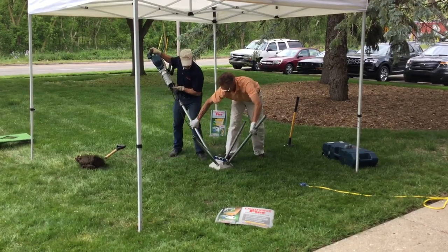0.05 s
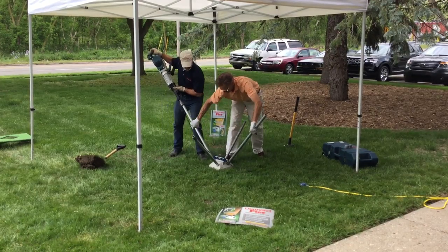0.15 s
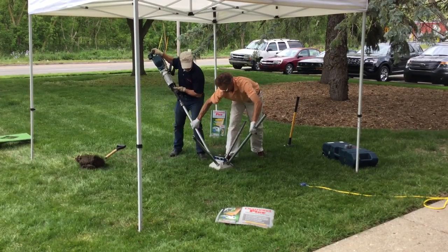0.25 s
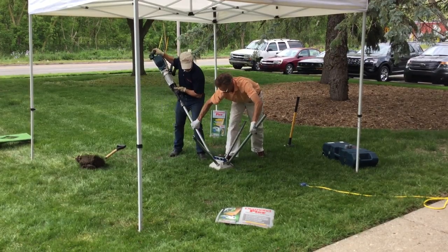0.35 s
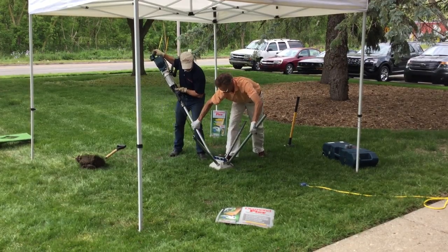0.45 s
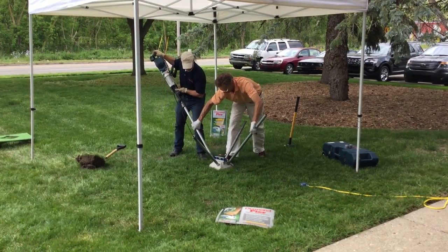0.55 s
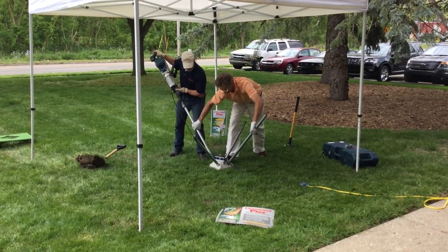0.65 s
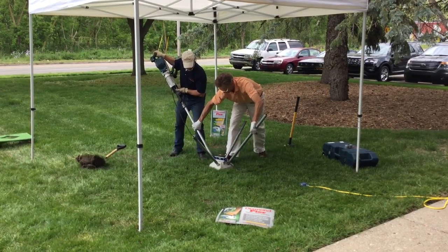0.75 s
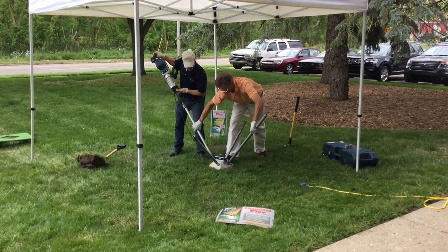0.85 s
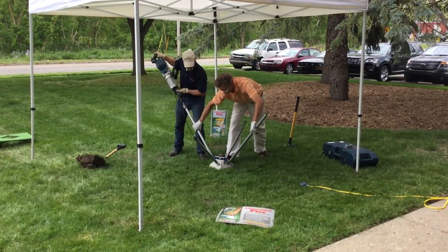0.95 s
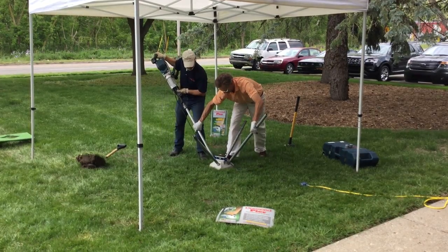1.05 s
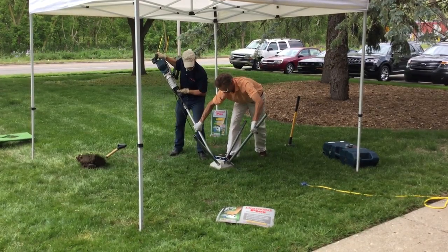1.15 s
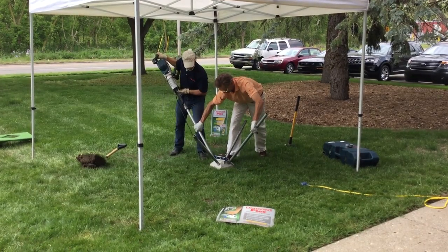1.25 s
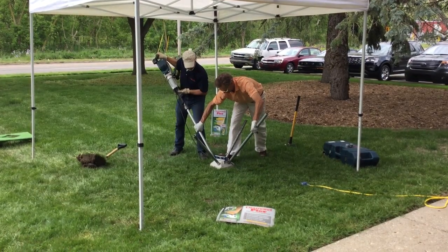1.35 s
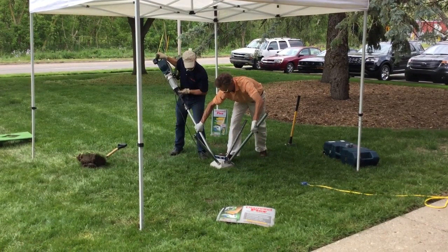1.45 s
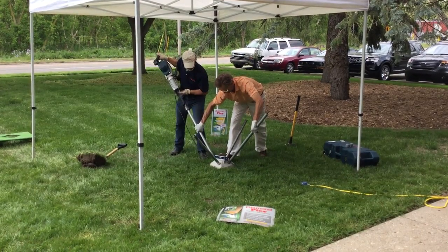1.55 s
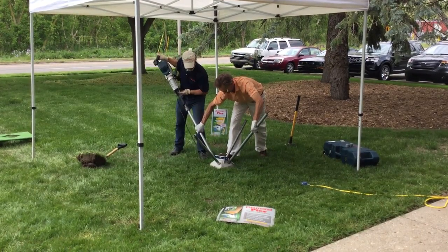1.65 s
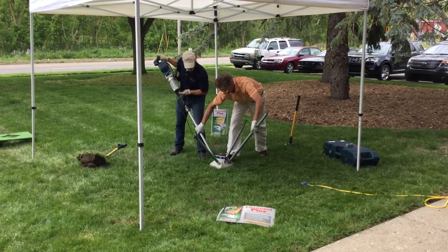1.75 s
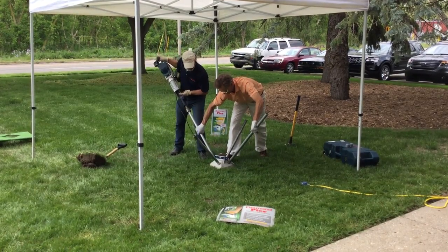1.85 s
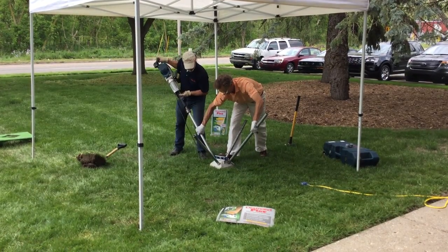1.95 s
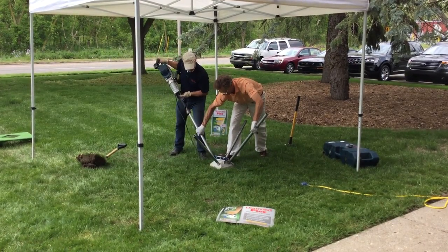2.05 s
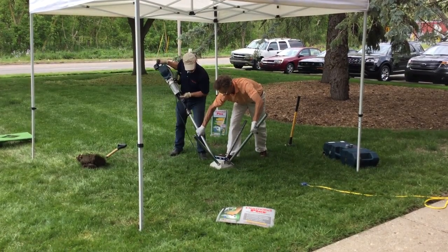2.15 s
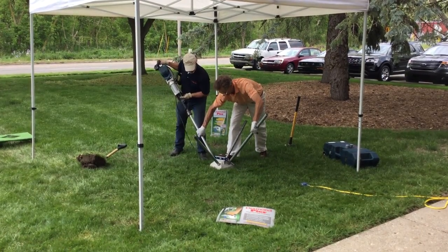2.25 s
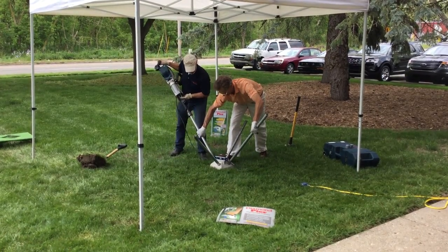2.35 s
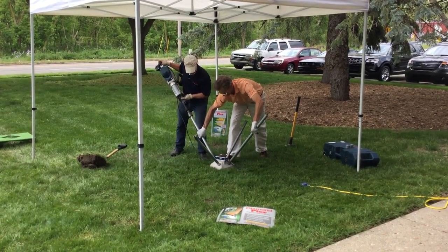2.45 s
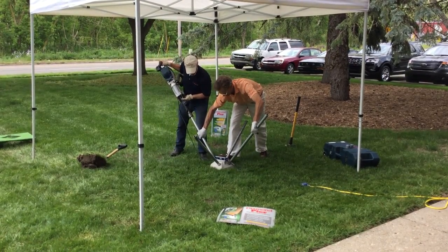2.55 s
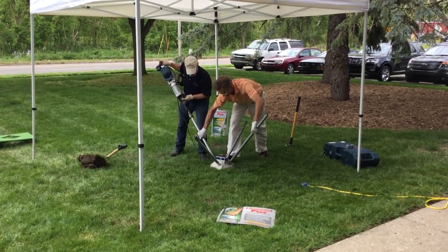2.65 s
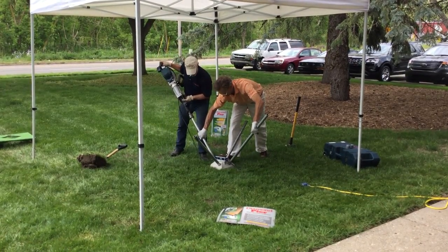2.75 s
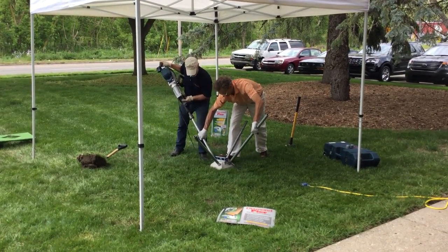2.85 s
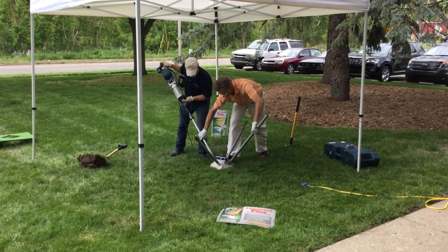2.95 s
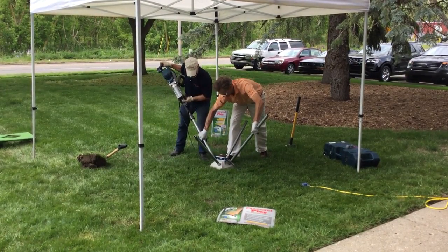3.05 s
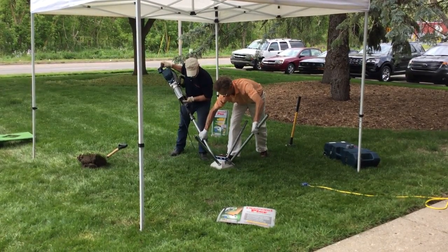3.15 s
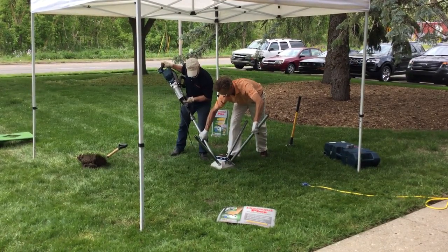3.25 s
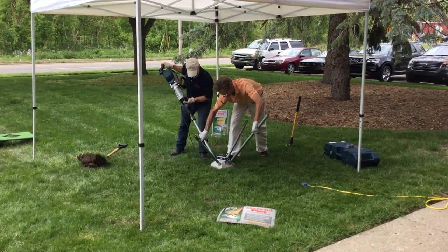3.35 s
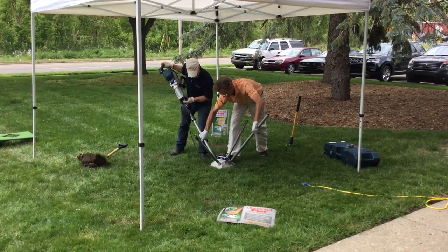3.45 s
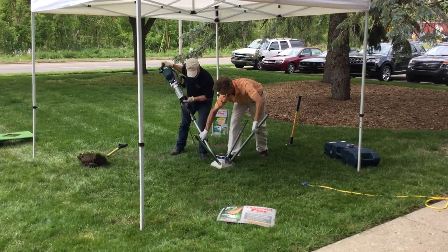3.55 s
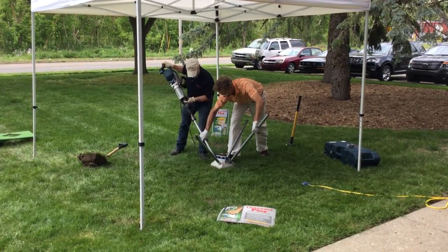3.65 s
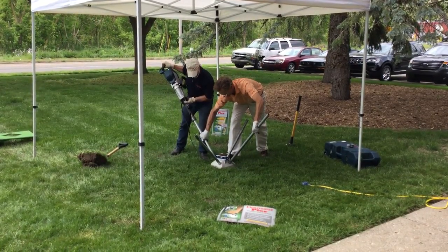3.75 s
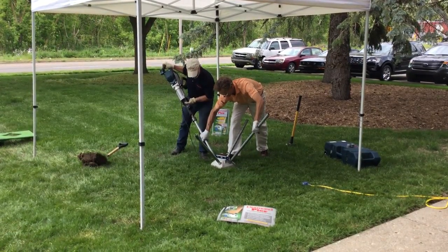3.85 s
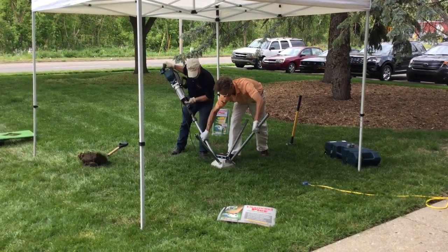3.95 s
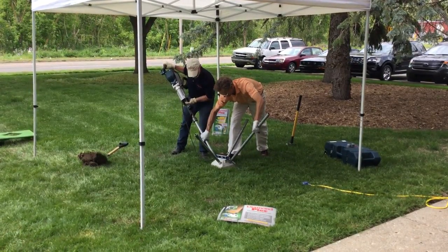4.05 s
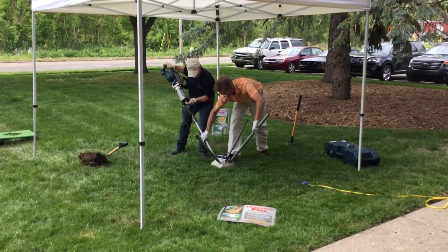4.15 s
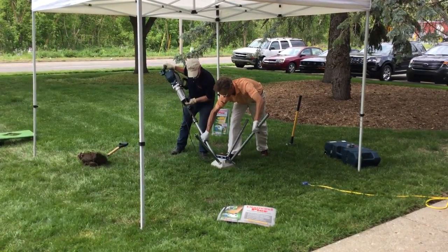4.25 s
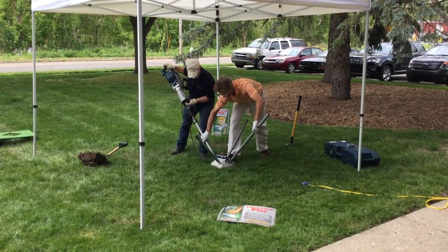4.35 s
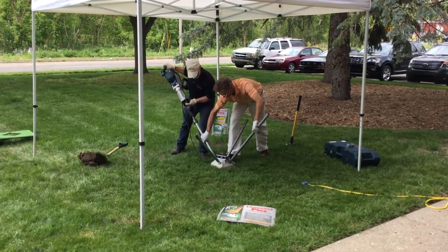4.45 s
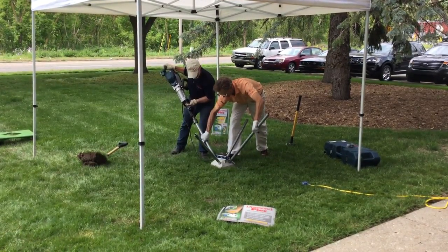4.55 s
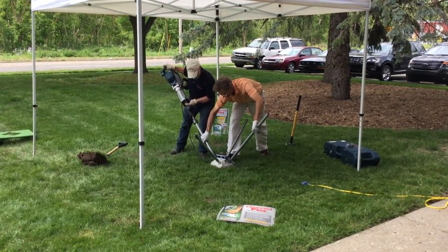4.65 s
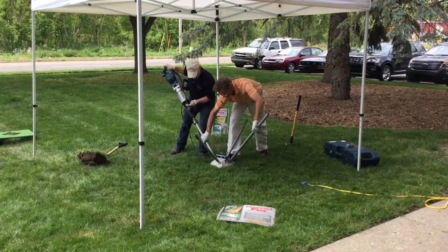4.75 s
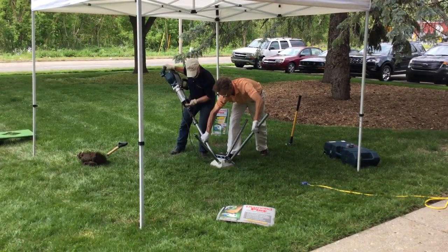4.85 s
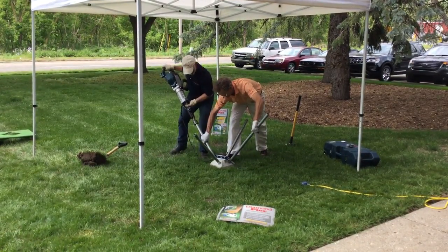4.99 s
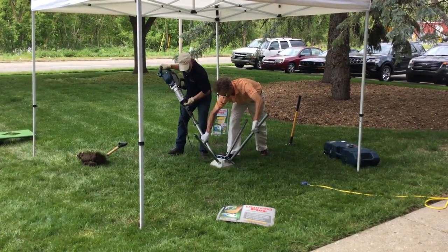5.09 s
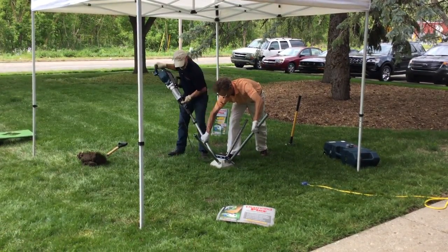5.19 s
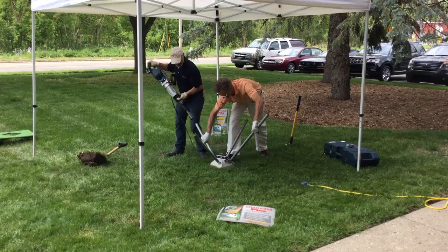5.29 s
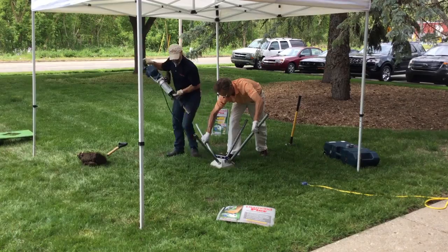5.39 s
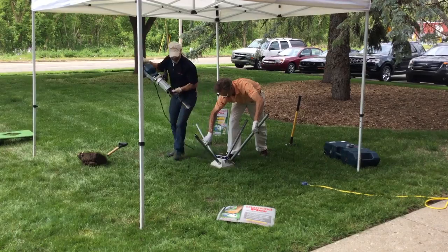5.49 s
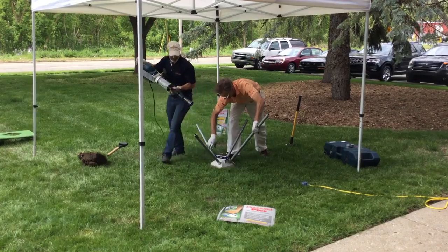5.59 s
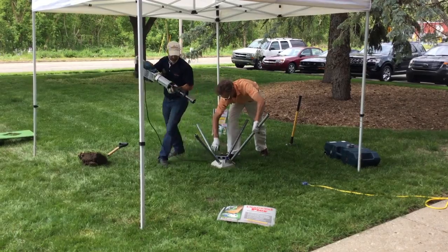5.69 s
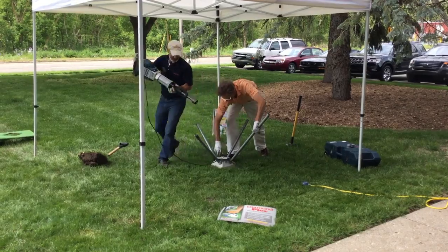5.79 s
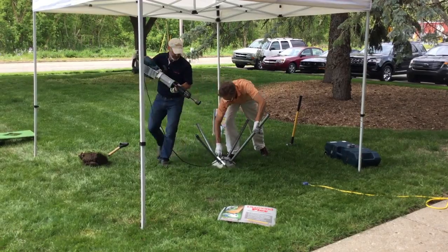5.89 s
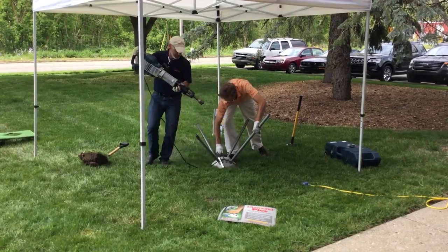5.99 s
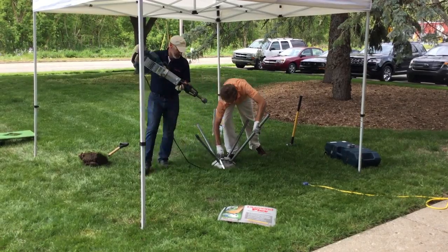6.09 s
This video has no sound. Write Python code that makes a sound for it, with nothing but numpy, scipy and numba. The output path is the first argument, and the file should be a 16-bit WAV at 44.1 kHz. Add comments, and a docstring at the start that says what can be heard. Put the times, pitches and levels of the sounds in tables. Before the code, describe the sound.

Outdoors, heard from a few metres away, an electric demolition hammer pounds a steel pin in a loud, rapid stream of clattering, ringing strikes with dull thumps beneath. Its motor roars and hisses behind the blows. Near the end the hammer lifts off and the strikes cease, leaving the softer whirr of the motor and a thin rising whine above a faint low rumble.

```python
"""An electric demolition hammer drives a steel pin into a lawn, a few metres away, about 22 blows a second.
Each blow cracks as metal meets metal, sets pin and bit ringing and lands with a low thud.
Under the blows the motor's gears roar and its fan hisses; lifted off near the end, the motor
runs free and its whine climbs. A low rumble lies beneath it all."""
import sys
import numpy as np
from scipy import signal
from scipy.fft import rfft, irfft
from scipy.io import wavfile
from scipy.ndimage import uniform_filter1d
from numba import njit

SR = 44100
rng = np.random.default_rng(int(sys.argv[2]) if len(sys.argv) > 2 else 0)


def log_audio(samples):
    """Write samples as a 16-bit WAV file to the path given in sys.argv[1]."""
    # one column per channel
    frames = np.atleast_2d(samples).T
    # limit to full scale, then quantise
    limited = np.clip(frames, -1, 1)
    pcm = np.round(limited * 32767).astype(np.int16)
    wavfile.write(sys.argv[1], SR, pcm)


N = 270185

# The hammer's blows: t/s, crack level/dB, thump level/dB, knock level/dB
HAMMER_BLOWS = [(0.0017, -19, -30, -38), (0.0433, -18.5, -24, -35), (0.0813, -15.5, -26, -31),
                (0.118, -14, -21, -34), (0.1541, -12, -15, -24), (0.1912, -12, -10.5, -4),
                (0.2351, -20.5, -29, -34), (0.2722, -21.5, -23, -21), (0.31, -16, -21, -32),
                (0.3514, -14.5, -19, -21), (0.3873, -9.5, -21, -29), (0.426, -12.5, -19, -30),
                (0.4669, -7.5, -10, 0.5), (0.5065, -10.5, -11, 3.5), (0.5497, -8, -16, 1),
                (0.5922, -9.5, -3, 0), (0.6362, -11, -17, -3), (0.6815, -11.5, -17, 2),
                (0.7268, -10.5, -2.5, 0), (0.773, -11, -8.5, -4), (0.818, -12.5, -18, -5),
                (0.8638, -12, -23, -4), (0.9096, -10.5, -5.5, 6), (0.955, -12, 2.5, 1),
                (1.0004, -10.5, -1.5, -3), (1.0467, -13, -12, -2.5), (1.092, -12.5, -6.5, -0.5),
                (1.138, -12.5, -7, -7), (1.1831, -13.5, -10, -4), (1.2294, -12, -5.5, 4),
                (1.276, -14.5, -11.5, -8), (1.3215, -11, -11, -3), (1.3654, -12, -10, -4),
                (1.411, -10.5, -6, 0), (1.4576, -12, -13, -3.5), (1.5034, -12.5, -17, -7),
                (1.5497, -10, -18, 0), (1.5956, -10, -19, 0), (1.6419, -12.5, -16, -11),
                (1.6887, -12, -31, -7), (1.734, -12, -13, -4), (1.7791, -11.5, -14, -1.5),
                (1.8261, -11.5, -32, 3), (1.871, -10.5, -23, 4), (1.9183, -11, -33, -30),
                (1.9661, -10.5, -10.5, -7), (2.0107, -13.5, -18, -4), (2.0566, -9, -22, -5),
                (2.1018, -10.5, -14.5, -8.5), (2.1492, -13, -7.5, -29), (2.1953, -12.5, -32, -21),
                (2.2404, -12.5, -8, -2), (2.2868, -12.5, -33, -12), (2.3329, -13.5, -16, -8),
                (2.3797, -11, -13, -19), (2.426, -12, -3.5, -6), (2.4716, -11, -11.5, -9),
                (2.5169, -10, -14, -11), (2.5627, -11, -14.5, -23), (2.6088, -12, -19.5, -7),
                (2.655, -9.5, -7, -5), (2.7005, -11, -19, -12), (2.7466, -13, -16, -13),
                (2.7935, -12.5, -25, -19), (2.8394, -13.5, -15, -8), (2.886, -11.5, -27, -5),
                (2.9316, -12.5, -20, -22), (2.978, -15, -21, -11.5), (3.0226, -14, -19, -9.5),
                (3.0695, -10, -10, -3), (3.1152, -10.5, -9, -6), (3.163, -13.5, -10, -17),
                (3.2085, -13, -25, -0.5), (3.2564, -8.5, -6.5, -1.5), (3.3032, -15.5, -11.5, -26),
                (3.3487, -15.5, -14, -5.5), (3.3952, -13, -19, -12), (3.4408, -11.5, -31, -30),
                (3.487, -13.5, -12.5, -23), (3.5326, -13, -31, -12), (3.5804, -13.5, -7, -21),
                (3.6264, -9, -18, -8.5), (3.6769, -13, -34, -26), (3.7177, -11.5, -36, -11),
                (3.767, -19, -35, -23), (3.812, -12.5, -42, -14), (3.8588, -13.5, -35, -13),
                (3.9021, -12.5, -20, -19), (3.9455, -8, -25, -4.5), (3.9898, -13, -26, -12),
                (4.0356, -10.5, -30, -6), (4.0829, -13, -26, -10), (4.1294, -14, -9, 0),
                (4.175, -12, -5, -7), (4.2211, -14.5, -16, -6.5), (4.2682, -13.5, -19, -30),
                (4.3153, -14, -21, -16), (4.3601, -12, -29, -20), (4.406, -13.5, -27, -22),
                (4.4546, -13.5, -40, -16), (4.4996, -12, -38, -17), (4.5467, -11, -13.5, -16),
                (4.591, -14, -19.5, -9.5), (4.641, -15, -35, -18), (4.6829, -16, -16.5, -18),
                (4.7317, -12.5, -33, -14), (4.7754, -14, -13, -25), (4.8243, -14, -22, -13),
                (4.869, -13, -15, -13), (4.917, -11.5, -37, -36), (4.9606, -15, -31, -20),
                (5.01, -17, -36, -15), (5.053, -13.5, -42, -32), (5.1029, -14, -26, -23),
                (5.149, -12, -28, -26), (5.194, -15.5, -19, -28), (5.2401, -12.5, -29, -19),
                (5.332, -28.5, -48, -40)]
def hammer(t):
    """Each blow cuts off the one before and fires three layers: ring, crack and thud."""
    blows = np.array(HAMMER_BLOWS, float)
    blow = np.maximum(np.searchsorted(blows[:, 0], t, side="right") - 1, 0)  # index of the latest blow
    age = t - blows[blow, 0]
    return steel_ring(blow, age, blows) + crack(blow, age, blows) + thud(blow, age, blows)


# Bright colour of the shock: f/Hz, level/dB
SHOCK_EQ = [(300, -6), (1000, -5.5), (3000, 4.5), (4500, -1.5), (6500, 8), (8200, -36), (9300, 12),
            (10500, -10), (14200, -10), (15000, -40), (16000, -40)]
# Colour of the clattering parts: f/Hz, level/dB
CLATTER_EQ = [(300, -6.5), (850, -7.5), (1200, 1), (3200, 1), (4600, -6), (7000, -1), (8200, -9.5),
              (10300, -7), (14300, -5.5), (14900, -80), (15500, -38)]
# Resonances in the clatter: f/Hz, width/Hz, level/dB
CLATTER_PEAKS = [(2750, 200, -3), (3100, 250, 2), (4200, 150, -4), (5890, 200, 4), (6700, 350, 4),
                 (7590, 300, 1), (9070, 400, 4), (11000, 500, -4), (14250, 300, 0)]
# Choked modes of bit and housing: f/Hz, level/dB re crack, t60/s
HOUSING_MODES = [(6700, 2.5, 0.025), (7550, -6.5, 0.028), (3020, -28.5, 0.01), (1726, -9.5, 0.03),
                 (5840, -6.5, 0.06), (1154, -16.5, 0.037)]
def crack(blow, age, blows):
    """Metal meets metal: the shock runs up and down the pin, the bit bounces, loose parts clatter."""
    chance = rng.standard_normal((len(blows), 12))[blow].T
    shock = sum(undb(-4.5 * k + 2.2 * chance[k]) * fade(age - .0013 * k, t60=.0045) for k in range(4))
    bounce = sum(undb(-5.5 + 1.9 * chance[7 + k]) * fade(age - delay * np.exp(.3 * chance[9 + k]), .01)
                 for k, delay in enumerate((.005, .011)))
    return_age, piston_hz = age - .029 - .0038 * chance[5], 2187  # the piston returns: a ping and a tick
    ping = undb(-26.5 + 5.3 * chance[4]) * fade(return_age, .32)
    ping *= np.sin(2 * np.pi * piston_hz * return_age)
    tick = undb(-15 + 3 * chance[4]) * fade(return_age, .008)
    loose = undb(-9 + 1.5 * chance[6]) * (fade(age, .045) + .42 * fade(age, .3)) * undb(3 * walk(300))
    out = undb(2.5) * shock * noise(SHOCK_EQ) + ping
    out += (loose + tick + bounce) * noise(CLATTER_EQ, CLATTER_PEAKS)
    for hz, db, t60 in HOUSING_MODES:
        strength, detune, start = rng.standard_normal((len(blows), 3))[blow].T
        cycles = hz * (1 + .0062 * detune) * age + start
        out += undb(db + 3 * strength) * fade(age, t60) * np.sin(2 * np.pi * cycles)
    return undb(blows[blow, 1]) * out


# Modes of pin and bit: f/Hz
RING_HZ = [5911, 6595, 3085, 14165, 9634, 13820, 8870, 9060, 13290, 15170, 1615]
# Random part of each mode's strike, and its decay: level/dB re crack, t60/s
RING_MODES = [(-13, .28), (-16, .25), (-15, .14), (-18, 0.33), (-11.5, 0.3), (-20, 0.48), (-21, 0.15),
              (-19, 0.14), (-28, .15), (-45, .15), (-23.5, .1)]
# Steady part of the strike: t/s, then level/dB re crack for each of the first four modes
RING_STEADY = [(0, -23, -5, -3, -9), (.2, -9, -4, -7, -7), (.45, -20, -7, -7, -18),
               (.85, -11, -21, -6.5, -15), (1.1, -5, -1, -1.5, -20), (1.35, -18, 0.5, -18, -16),
               (1.65, -7, -4.5, -8, -10), (1.9, -19, -13, -9, -10), (2.4, -15, -8, -22, -23),
               (2.85, -1.5, -16.5, -12, -11), (3.3, -5, -12, -12, -11), (3.55, -7, -27, -21, -16),
               (4.1, -3.5, -8.5, -13, -15), (4.6, -12.5, -9, -13, -12), (5.25, -2.5, -9, -3.5, -9)]
def steel_ring(blow, age, blows):
    """Every blow restarts each mode, beating with a close twin; hands and soil roughen the ring."""
    out, steady_db = 0, along(RING_STEADY, blows[:, 0])
    for k, (hz, (db, t60)) in enumerate(zip(RING_HZ, RING_MODES)):
        real, imag, detune, split = rng.standard_normal((len(blows), 4)).T
        start, twin_start = 2 * np.pi * rng.random((len(blows), 2)).T
        steady = undb(steady_db[k]) if k < len(steady_db) else 0
        strength = np.abs(undb(db) * (real + 1j * imag) / np.sqrt(2) + steady) * undb(blows[:, 1])
        phase = 2 * np.pi * (hz + 7 * detune[blow]) * age + .5 * walk(150)
        twin = .3 * np.sin(phase + 2 * np.pi * 30 * split[blow] * age + twin_start[blow])
        envelope = strength[blow] * undb(2 * walk(130)) * fade(age, t60)
        out += envelope * (np.sin(phase + start[blow]) + twin)
    swell = 1 - .5 * np.exp(-np.maximum(age, 0) / .012)  # the ring dips at the crack, then swells back
    return swell * out


# Level ride of the base plate: t/s, level/dB re crack
PLATE_RIDE = [(0, -15), (.4, -15.5), (.9, -12), (1.5, -11.5), (1.85, -22.5), (2.4, -15), (3.4, -15),
              (3.75, -23), (3.95, -12.5), (5.25, -11.5)]
# Colour of the plate's buzz: f/Hz, level/dB
PLATE_EQ = [(90, -11), (150, -6.5), (230, -0.5), (300, -8.5), (420, -25), (600, -46)]
def thud(blow, age, blows):
    """A low thump that falls quickly in pitch as it dies, a knock, and the base plate's hum and buzz."""
    chance = rng.standard_normal((len(blows), 7))[blow].T
    age = np.maximum(age - .0006, 0)  # lands just behind the crack
    cycles = pitch_drop(age, from_hz=434, to_hz=71, glide_s=.003 * np.exp(.35 * chance[0]))
    tone = fade(age, .05 * np.exp(.25 * chance[5])) * np.sin(2 * np.pi * (cycles + .36 + .12 * chance[1]))
    low_noise = .2 * fade(age, .06) * noise([(40, -12), (80, 0), (160, -2), (400, -12), (700, -40)])
    thump = (1 - np.exp(-age / .0011)) * (tone + low_noise)
    cycles = pitch_drop(age, from_hz=1098, to_hz=270, glide_s=.0014 * np.exp(.43 * chance[2]))
    knock = (1 - np.exp(-age / .00075)) * fade(age, .011) * np.sin(2 * np.pi * (cycles + .23 * chance[3]))
    plate_hz = 225.7 * (1 + .04 * chance[4])
    hum = fade(age, .062) * np.sin(2 * np.pi * plate_hz * age)
    buzz = .49 * fade(age, .17) * noise(PLATE_EQ)
    onset, crack_db, thump_db, knock_db = blows[blow].T
    plate_db = crack_db + along(PLATE_RIDE, onset)[0] + 2.94 * chance[6]
    return undb(thump_db) * thump - undb(plate_db) * (hum + buzz) + undb(knock_db) * knock


# Overtones of the whine: multiple of the slot rate, relative level/dB
WHINE_OVERTONES = [(2, 0), (3, -7)]
def armature_whine(t):
    """Running free, the armature whines at its slot rate, climbing towards full speed."""
    freed_s, spin_up_s, loaded_hz, full_hz = 5.36, .34, 3500, 4330
    lag = np.exp(-np.maximum(t - freed_s, 0) / spin_up_s)
    hz = full_hz - (full_hz - loaded_hz) * lag
    phase = 2 * np.pi * np.cumsum(hz * (1 + .0013 * walk(60))) / SR
    overtones = sum(undb(db + 3 * walk(33)) * np.sin(k * phase) for k, db in WHINE_OVERTONES)
    brightness = undb(-2) * np.clip((t - 5.55) / .15, .15, 1)
    tone = undb(2.2 * walk(25)) * np.sin(phase) + brightness * overtones
    fade_in = np.clip((t - freed_s) / .08, 0, 1) ** 2
    return undb(-46 + 9 * lag) * fade_in * tone  # the surge eases as the armature spins up


# Colour of the motor's roar: f/Hz, level/dB
ROAR_EQ = [(180, -58), (300, 3.5), (337, -8.5), (516, -4), (618, 2.5), (765, -8.5), (979, 0.5),
           (1290, -7.5), (1580, 1.5), (3700, 0), (4150, -2), (5060, -3.5), (8140, -4.5), (15200, -12)]
# Resonances of the motor housing: f/Hz, width/Hz, level/dB
ROAR_PEAKS = [(1086, 42, 2), (1244, 123, 16.5), (1606, 114, 6), (2157, 310, 5.5), (3180, 86, -6),
              (606, 170, -4)]
# Level ride of the motor: t/s, roar level/dB, fan shelf level/dB re roar
MOTOR_RIDE = [(0, -30.5, 2.5), (5.22, -32, 7.5), (5.29, -35, -4), (5.4, -37, -2), (5.5, -32, -4),
              (5.75, -30, -1), (6.13, -29, -2)]
def motor_roar(t):
    """Gears roar in the housing; the fan's hiss is a treble shelf on the same noise."""
    roar_db, fan_db = along(MOTOR_RIDE, t)
    roar = undb(walk(25) + .8 * walk(250)) * noise(ROAR_EQ, ROAR_PEAKS)
    fan = signal.sosfiltfilt(signal.butter(1, 4500, "high", fs=SR, output="sos"), roar)
    return undb(roar_db) * (roar + (undb(fan_db) - 1) * fan)


# Colour of the low bed: f/Hz, level/dB
RUMBLE_EQ = [(15, -38), (25, -6), (81, -3), (150, -9.5), (292, -20.5), (348, -17), (370, -56), (500, -20),
             (650, -57), (1100, -120)]
# Level ride of the low bed: t/s, level/dB
RUMBLE_RIDE = [(0, -44.5), (5.3, -41.5), (5.45, -41.5), (6.13, -39.5)]
def rumble(t):
    """A bed of low noise that wavers gently."""
    return undb(along(RUMBLE_RIDE, t)[0] + 2 * walk(6)) * noise(RUMBLE_EQ)


def undb(db):
    return 10 ** (np.asarray(db) / 20)


def noise(eq, peaks=()):
    """Noise of rms 1, coloured by an EQ curve and lifted at resonant peaks."""
    hz = np.maximum(np.arange(N // 2 + 1) * SR / N, 1)
    eq_hz, eq_db = np.transpose(eq)
    gain = undb(np.interp(np.log(hz), np.log(eq_hz), eq_db, left=-90))
    lift = 1 + .74 * sum(undb(db) / (1 + (2 * (hz - centre) / width) ** 2) for centre, width, db in peaks)
    x = irfft(rfft(rng.standard_normal(N)) * gain * lift, N)
    return x / np.std(x)


def walk(rate):
    """Smooth random wobble, rate steps a second, with a spread near 1."""
    hold = int(SR / rate)
    steps = np.repeat(rng.standard_normal(N // hold + 1), hold)
    return 1.22 * uniform_filter1d(uniform_filter1d(steps, hold), hold)[:N]


def fade(age, t60):
    """Exponential decay that starts at age 0."""
    return (age >= 0) * np.exp(-np.log(1000) * np.maximum(age, 0) / t60)


def pitch_drop(age, from_hz, to_hz, glide_s):
    """Cycles run by a tone that falls from one pitch to another."""
    return to_hz * age + (from_hz - to_hz) * glide_s * (1 - np.exp(-age / glide_s))


def along(ride, t):
    """Columns of a ride at the times t."""
    times, *columns = np.transpose(ride)
    return [np.interp(t, times, column) for column in columns]


@njit
def limiter(x, ceiling, attack_s, release_s):
    """Follows the peaks and holds them near the ceiling."""
    attack, release = 1 / (attack_s * SR), 1 / (release_s * SR)
    y, envelope = np.empty(len(x)), 0.
    for i in range(len(x)):
        envelope += (abs(x[i]) - envelope) * (attack if abs(x[i]) > envelope else release)
        y[i] = x[i] * min(1., ceiling / (envelope + 1e-9))
    return y


def scene():
    """Mono mix: blows in front, motor behind, rumble beneath."""
    t = np.arange(N) / SR
    return (hammer(t) + armature_whine(t) + motor_roar(t) + rumble(t))[None]


def record(dry):
    """A phone drops the deepest bass, limits and rounds the peaks and cuts the top."""
    x = signal.sosfilt(signal.butter(2, 48, "high", fs=SR, output="sos"), dry[0])
    x = limiter(x, ceiling=.52, attack_s=.00024, release_s=.0086)
    x = .66 * np.tanh(x / .66)
    return signal.sosfilt(signal.ellip(10, .2, 60, 15220, fs=SR, output="sos"), x)[None]


dry = scene()
out = record(dry)
log_audio(out)
```